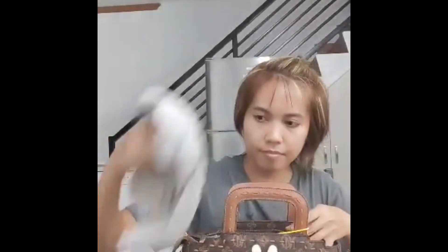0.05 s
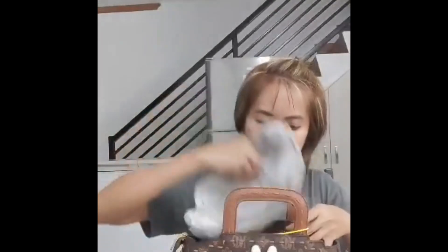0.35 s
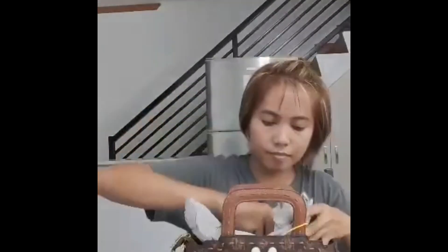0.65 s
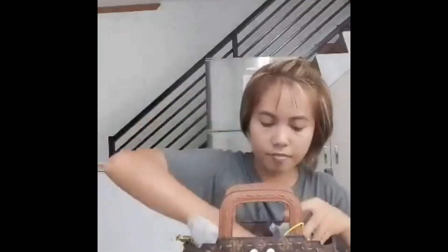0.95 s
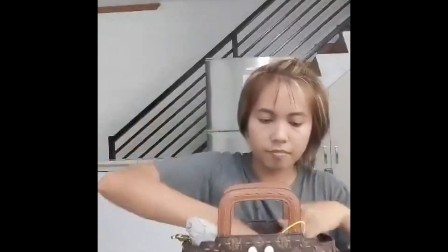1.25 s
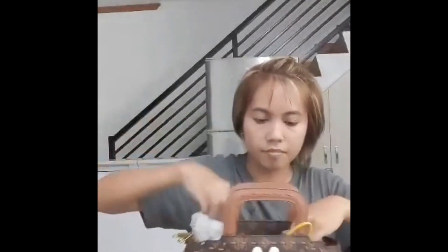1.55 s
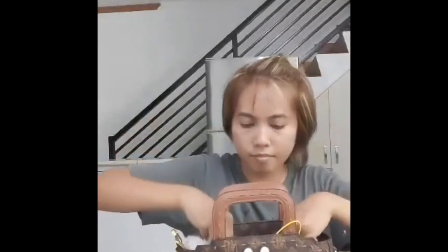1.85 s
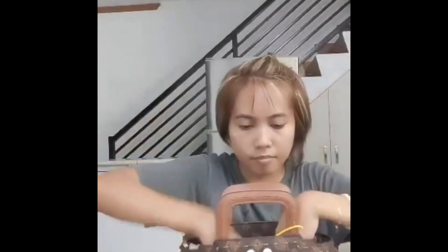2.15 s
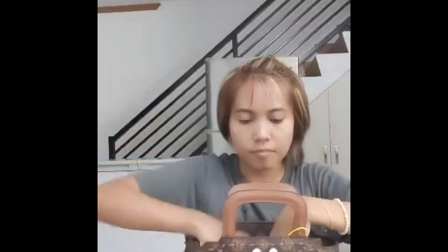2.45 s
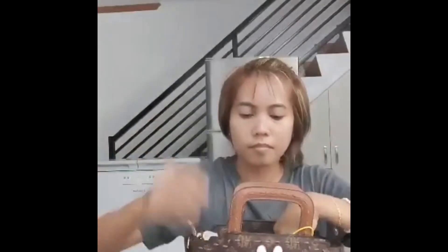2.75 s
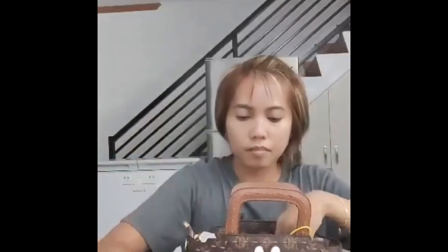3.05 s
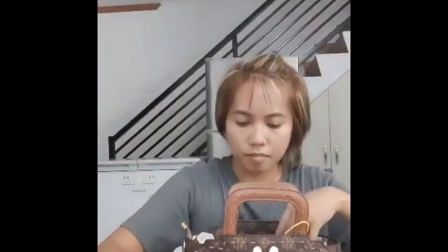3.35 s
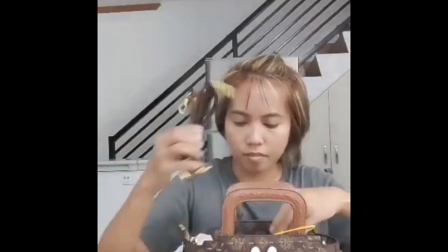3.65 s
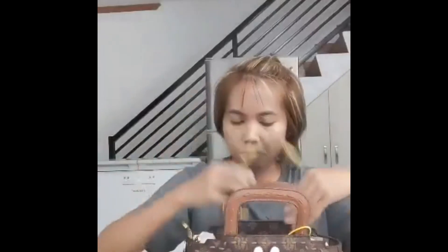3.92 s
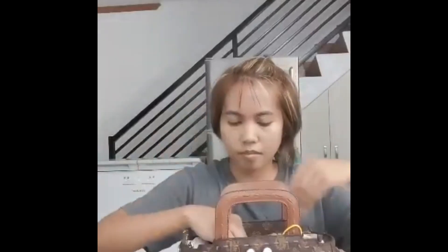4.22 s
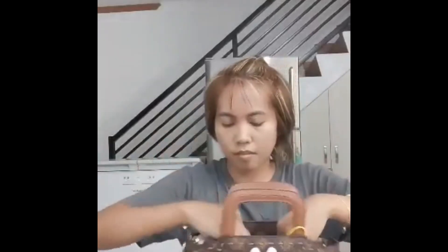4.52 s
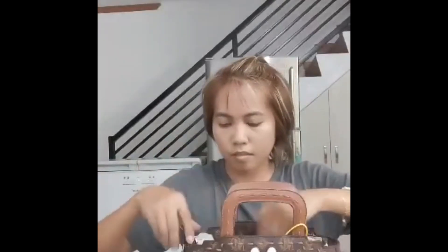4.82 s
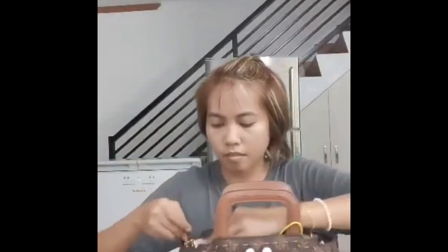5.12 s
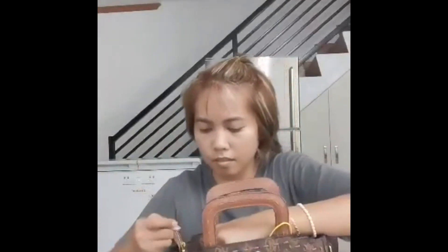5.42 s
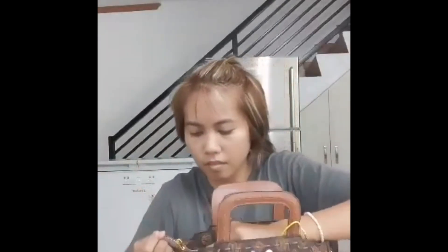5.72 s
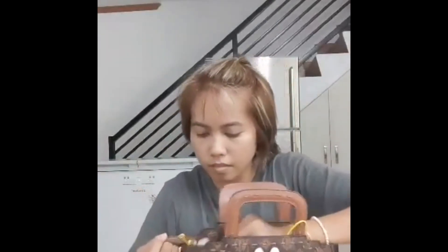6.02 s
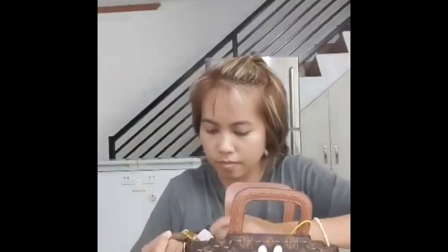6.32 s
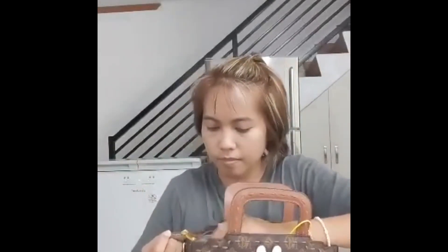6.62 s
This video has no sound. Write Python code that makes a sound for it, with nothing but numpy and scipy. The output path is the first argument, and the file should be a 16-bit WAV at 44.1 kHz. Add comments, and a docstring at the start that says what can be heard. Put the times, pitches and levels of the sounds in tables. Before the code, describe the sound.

Hands rummage in a handbag, paper crinkling in bursts with dull bumps and a faint metal clasp jingle, in a hard-walled room.

```python
"""Crumpled paper scrapes and crackles as two hands stuff it into a stiff handbag and rummage in it.
Fibres stick and slip, creases buckle and pop. The bag's hollow shell rumbles under the rubbing
and thuds when bumped; the metal clasp of a strap clinks faintly as the strap is lifted.
A hard-walled room adds a low boom, even reverberation and a faint steady noise."""
import sys
import numpy as np
from scipy import signal
from scipy.io import wavfile
from scipy.ndimage import uniform_filter1d

SR = 44100
rng = np.random.default_rng(int(sys.argv[2]) if len(sys.argv) > 2 else 0)


def wav_record(signal):
    """Record a signal, one row per channel, as 16-bit PCM in the file named by sys.argv[1]."""
    frames = np.transpose(np.atleast_2d(signal))
    bounded = np.clip(frames, -1, 1)
    # unit amplitude maps onto the largest positive 16-bit level
    quanta = np.round(bounded * 32767).astype(np.int16)
    wavfile.write(sys.argv[1], SR, quanta)


N = 298557

# Paper spectra (body, crinkle, top-end fizz): freq_hz, gain_db
PAPER_EQ = [(30, -47), (60, -38), (200, -8.5), (500, -0.5), (900, 1), (1500, -2.5), (2200, -2.5),
            (3500, -12), (6000, -40.5), (14000, -39.5)]
CRISP_EQ = [(300, -25.5), (1200, -6), (2000, -2.5), (2600, -1.5), (3700, 0), (4400, -13.5), (6000, -28),
            (14000, -56)]
FIZZ_EQ = [(1500, -40), (3600, -13), (4400, -3.5), (5200, 0), (5800, -2.5), (6500, 0), (7000, -3.5),
           (7600, -15), (8400, -13), (9400, -16), (10500, -15), (13000, -22)]
# Hand strokes: start_s, length_s, level_db, crisp_rel_db, fizz_rel_db, pressure_db, pitch_hz
HAND_STROKES = [(-0.003, 0.02, -58, -2, -2, -70, 2400), (0.026, 0.093, -52, -4, -5, -63, 2700),
                (0.118, 0.16, -44, -1, -6, -51.5, 2530), (0.285, 0.073, -42.5, 3, -5, -41.5, 2430),
                (0.418, 0.092, -49.5, 4.5, -3.5, -48.5, 2610), (0.477, 0.19, -41.5, 1, -6.5, -40, 2730),
                (.68, 0.061, -42, -1.5, -8.5, -42, 2350), (0.77, 0.14, -56, 3.5, -9, -59, 2300),
                (0.931, 0.12, -44.5, -0.5, -9, -49, 2470), (1.07, 0.052, -47.5, 0.5, -4, -50, 2180),
                (1.177, 0.19, -51, 4, -2.5, -52, 2850), (1.369, 0.14, -46, 4, -6, -48.5, 2740),
                (1.487, 0.11, -43, -1.5, -7.5, -48, 2700), (1.607, 0.21, -48.5, -2, -10.5, -46, 2100),
                (1.751, 0.17, -40, 1, -8.5, -40.5, 2450), (1.89, 0.11, -42, -4, -8, -46, 2300),
                (2.05, 0.097, -53.5, -2.5, -8, -55, 2250), (2.147, 0.15, -47, -2, -9.5, -44, 2250),
                (2.335, 0.19, -59.5, -6.5, -14, -59.5, 2170), (2.553, 0.44, -62.5, -5, -14, -59.5, 2170),
                (2.758, 0.036, -56, -1.5, -9, -64, 2440), (2.87, 0.14, -58, 0.5, -7.5, -60, 2050),
                (3.123, 0.087, -72.5, 3, -8, -72, 2200), (3.492, 0.07, -70, 3.5, -4.5, -74, 3220),
                (3.63, 0.038, -81, -7, -10, -73, 2100), (3.76, 0.068, -48, -2.5, -9.5, -48.5, 2320),
                (3.94, 0.15, -50, -8, -13.5, -52, 1900), (4.154, 0.087, -46.5, -6, -11.5, -47.5, 2100),
                (4.286, 0.025, -56.5, 4, -4.5, -59, 2500), (4.442, 0.038, -55.5, -4, -9.5, -59, 2140),
                (4.776, 0.055, -65, 6, 0, -68.5, 2900), (4.858, 0.14, -58.5, 5.5, -5, -57.5, 2900),
                (5.035, 0.13, -59, -0.5, -5.5, -58, 2500), (5.136, 0.11, -54.5, -4, -8, -59.5, 2300),
                (5.31, 0.079, -63.5, -1, -6, -63, 2800), (5.433, 0.12, -58, -15, -19, -58.5, 1700),
                (5.527, 0.069, -55, 1.5, -13, -61, 2200), (5.624, 0.12, -58.5, -4, -10, -61, 2000),
                (5.757, 0.077, -54, 4, -6, -51, 2460), (5.95, 0.067, -59, 5, -8, -63, 2060),
                (6.025, 0.04, -56, 6, -4, -54, 2600), (6.096, 0.03, -58, 6, -4, -55, 2620),
                (6.197, 0.034, -58.5, 4, -7, -55.5, 2490), (6.292, 0.11, -52.5, 7, -4.5, -52.5, 3300),
                (6.352, 0.14, -47.5, -1, -10, -47, 2770), (6.6, 0.11, -52.5, 3.5, -7.5, -51.5, 2330)]


def paper_rustle():
    """Fibres scrape and tiny creases buckle; each stroke meets folds that crinkle at another pitch."""
    start_s, length_s, level_db, crisp_db, fizz_db, _, pitch_hz = np.transpose(HAND_STROKES)
    folds = buckling_folds(per_s=1500, spread_db=3, q=2.3)
    ticks = amp(-4.5) * slips(per_s=420, spread_db=-0.5)
    scrape = amp(-7) * slips(per_s=9000, spread_db=-1)
    force = bunching(rate_hz=110, depth_db=3.4) * (folds + ticks + scrape)
    glide_hz = np.interp(np.arange(N) / SR, start_s + length_s / 2, pitch_hz)
    crinkle = moving_resonance(colour(force, CRISP_EQ), glide_hz, width_hz=3500)
    body = amp(-1.4) * unit_rms(colour(force, PAPER_EQ)) * stroke_envelope(level_db)
    crisp = amp(-2.5) * unit_rms(crinkle) * stroke_envelope(level_db + crisp_db)
    fizz = amp(2) * unit_rms(colour(force, FIZZ_EQ)) * stroke_envelope(level_db + fizz_db)
    return body + crisp + fizz


def stroke_envelope(levels_db, swell_share=0.33, settle_s=0.07, sag_db=-1.62):
    """Each stroke gathers speed, tires a little and dies as the folds settle; overlaps add in power."""
    power, t = np.zeros(N), np.arange(SR) / SR
    for (start_s, length_s, *_), level_db in zip(HAND_STROKES, levels_db):
        swell = np.minimum(t / (swell_share * length_s), 1)
        sag = amp(sag_db * np.minimum(t / length_s, 1))
        settle = np.exp(-np.maximum(t - length_s, 0) / settle_s)
        add(power, start_s, (amp(level_db) * swell * sag * settle) ** 2)
    return np.sqrt(power)


def buckling_folds(per_s, spread_db, q, bands=18):
    """Each size of fold pings at its own pitch, in its own brief bunches."""
    out = np.zeros(N)
    for pitch_hz in np.geomspace(600, 12000, bands):
        hits = rng.integers(0, N, int(per_s * N / SR / bands))
        strength = amp(spread_db * np.minimum(rng.exponential(1, len(hits)), 3))
        force = np.zeros(N)
        force[hits] = strength * rng.choice([-1, 1], len(hits))
        bunch_db = 3 * np.minimum(rng.standard_normal(300), 1.5)
        bunch = amp(np.interp(np.arange(N), np.linspace(0, N, len(bunch_db)), bunch_db))
        out += np.sqrt(pitch_hz) * unit_rms(bunch * resonance(force, pitch_hz, q))
    return unit_rms(out)


# Snapping creases: start_s, level_db, fizz_rel_db, crumble_s, pitch_hz
CREASE_SNAPS = [(0.036, -45, -2.5, 0.0096, 3240), (0.054, -35.5, -9, 0.0032, 2470),
                (0.086, -43, -13, 0.0011, 2820), (0.1, -39, -12, 0.0035, 1610),
                (0.175, -39.5, -7, 0.003, 1040), (0.194, -37, -7, 0.006, 890),
                (0.242, -35, -19, 0.0022, 1500), (0.326, -36, -11, 0.013, 1620),
                (0.338, -33.5, -6, 0.005, 1610), (0.362, -28.5, -13, 0.0064, 1230),
                (0.383, -36, -6, 0.006, 1810), (0.508, -41.5, -5, 0.014, 965),
                (0.542, -43, -6, 0.0052, 1290), (0.743, -35.5, -14, 0.006, 2520),
                (0.759, -43, -13, 0.0049, 840), (1.015, -39.5, -7, 0.0098, 1800),
                (1.104, -37, -25, 0.011, 1370), (1.277, -41, -13, 0.002, 1130),
                (1.341, -40.5, -11, 0.0035, 1060), (1.399, -43, 1, 0.003, 2750),
                (1.42, -43, 1, 0.0013, 3340), (1.45, -36, -15, 0.007, 2850),
                (1.572, -34, -23, 0.0023, 1320), (1.597, -44, -15, 0.005, 1600),
                (1.8, -35.5, -1.5, 0.0022, 3540), (1.837, -37, -21, 0.008, 1420),
                (1.883, -34.5, -19, 0.005, 1510), (1.922, -33.5, -12, 0.0055, 710),
                (1.937, -34, -17, 0.0054, 1230), (1.995, -38, -12, 0.0036, 1260),
                (2.144, -38.5, -18, 0.0015, 1030), (2.431, -48, -11, 0.0024, 1470),
                (2.738, -54, -13, 0.0026, 1140), (2.78, -45, -18, 0.011, 2350),
                (2.815, -48, -15, 0.0026, 1330), (2.934, -43.5, -17, 0.0058, 1200),
                (3.001, -49, -16, 0.0028, 1400), (3.155, -59, -16, 0.009, 1940),
                (3.662, -60, -12, 0.0093, 1880), (3.77, -45.5, -19, 0.0017, 666),
                (3.803, -41.5, -10.5, 0.006, 1790), (3.821, -37.5, -17, 0.0072, 950),
                (4.002, -39, -12, 0.0022, 1630), (4.027, -49, -6, 0.005, 1450),
                (4.202, -34, -17, 0.0025, 1220), (4.216, -40.5, -9, 0.008, 1250),
                (4.243, -44, -18, 0.004, 885), (4.907, -50, -11, 0.003, 3190),
                (4.932, -47.5, -7, 0.005, 3190), (4.965, -42.5, -12, 0.0023, 3560),
                (5.024, -51, -11, 0.0024, 2850), (5.178, -49, -14, 0.0054, 1610),
                (5.206, -46, -9, 0.0037, 1750), (5.54, -48.5, -10, 0.005, 710),
                (5.565, -48, -16, 0.003, 2530), (5.583, -41, -18, 0.003, 760),
                (5.786, -49, -14, 0.003, 1320), (5.826, -47.5, -7, 0.0089, 1640),
                (6.036, -44, -12, 0.0053, 1860), (6.052, -45.5, -14, 0.0047, 2750),
                (6.122, -48, -5, 0.0033, 3560), (6.23, -51, -5, 0.008, 900), (6.32, -56, -4, 0.0054, 2380),
                (6.343, -51, 2, 0.0014, 3730), (6.382, -37.5, -1, 0.0022, 930),
                (6.392, -38, -4, 0.0036, 3420), (6.425, -39, -16, 0.0028, 1670),
                (6.467, -39.5, -9, 0.0025, 2610), (6.529, -50, -12, 0.0027, 2070)]


def paper_snaps(size=4096):
    """A crease pops at its own pitch; its neighbours crumble and fizz for some milliseconds."""
    out, t = np.zeros(N), np.arange(size) / SR
    for start_s, level_db, fizz_db, crumble_s, pitch_hz in CREASE_SNAPS:
        crumble = sparse_noise(size, density=0.3) * np.exp(-t / crumble_s)
        force = (t == 0) + amp(-2) * crumble
        crack = colour(force, PAPER_EQ) + colour(force, CRISP_EQ)
        pop = amp(-2) * unit_peak(resonance(crack, pitch_hz, q=0.77) + amp(-9.5) * crack)
        fizz = amp(fizz_db - 3) * unit_peak(colour(crumble * np.sqrt(t), FIZZ_EQ))
        add(out, start_s, amp(level_db) * (pop + fizz))
    return out


# Modes of the bag's shell and hollow: freq_hz, width_hz, gain_db
SHELL_MODES = [(208, 10.2, -1.5), (257.3, 36, -0.5), (320, 53, 3.5), (387.2, 32, 0), (450, 34, -12.5),
               (549, 17, -8.5), (608.6, 25, -1.5), (656, 18, -10), (868, 27, 1.5), (936, 32, 0.5),
               (1110, 39, 3), (1184, 26, 1.5)]
# Low room resonances that boom after bumps and under rubbing: freq_hz, width_hz, gain_db
ROOM_MODES = [(120.5, 6.2, -2), (141.5, 5.9, 0.5), (180.3, 9.1, -4), (207, 5.7, 0)]


def bag_rumble():
    """Rubbing shakes the bag's stiff walls and the air inside, and stirs the room's low resonances."""
    pressure_db = [db for *_, db, _ in HAND_STROKES]
    pressure = stroke_envelope(pressure_db, swell_share=0.43, settle_s=0.064)
    shell = ring(slips(per_s=260, spread_db=1.5), SHELL_MODES)
    shell = unit_rms(colour(shell, [(80, -28), (200, -3), (650, -2), (1500, -15.5)]))
    boom = ring(slips(per_s=650, spread_db=5.5), ROOM_MODES)
    boom = unit_rms(colour(boom, [(40, 3.5), (110, -4.5), (200, 8.5), (500, -16.5)]))
    return amp(-2) * pressure * bunching(rate_hz=44, depth_db=1.5) * (shell + amp(-20) * boom)


# Spectra of the bag wall's knock and the contents' rattle: freq_hz, gain_db
KNOCK_EQ = [(30, -42), (60, -29.5), (150, -11), (260, 1), (520, -2), (1200, 3), (2300, 15.5), (3500, -8),
            (12000, -55)]
RATTLE_EQ = [(60, -34), (150, -8.5), (300, -0.5), (520, -6.5), (900, -0.5), (1500, -7), (2200, -10),
             (4000, -20), (12000, -58)]
# Fingers and strap hitting the bag: start_s, level_db, pitch_hz, boom_rel_db, rattle_rel_db
BAG_BUMPS = [(0.305, -33.5, 296, -24, -2.5), (.318, -30.5, 271, -19, -4.5), (.335, -33, 266, -15, -10),
             (.564, -34.5, 276, -22, -13), (.762, -35.5, 310, -33, -17), (.922, -48, 392, -25, -11),
             (1.265, -42.5, 520, -22, -11), (1.341, -42, 480, -30, -12), (1.925, -26, 366, -28, -10),
             (1.939, -31.5, 330, -19, -7.5), (2.144, -41.5, 600, -26, -6), (2.934, -49, 820, -4, -6),
             (3.002, -54, 450, -24, -5), (3.771, -44.5, 270, -13, -9), (3.778, -44, 220, -4, -14),
             (3.821, -36, 407, -9, -5), (3.827, -38.5, 230, -4.5, -10.5), (3.875, -51.5, 220, -3, -5),
             (4.027, -44, 270, -15, -7), (4.203, -42.5, 380, -19, -11), (4.449, -51.5, 1060, -8, -4),
             (4.507, -52, 320, -15, -7.5), (5.066, -54, 326, -18, -5), (5.374, -47.5, 870, -15, -11),
             (5.411, -46.5, 750, -9.5, -8.5), (5.452, -62, 500, -10, -3), (5.537, -52, 400, -13, -8),
             (5.583, -37, 670, -9.5, -11), (5.787, -48.5, 260, -6, -16), (5.895, -53, 189, -1, -12),
             (6.036, -45.5, 326, -9, -13), (6.226, -45, 343, -27, -16), (6.244, -47.5, 320, -22, -9),
             (6.383, -38.5, 480, -30, -10), (6.67, -46, 320, -21, -10), (6.722, -40.5, 460, -22, -8)]


def bag_thuds(decay_cycles=0.67, rattle_s=0.011, size=16384):
    """The padded wall knocks for about a cycle; the shell rings, the contents rattle, the room booms."""
    out, t = np.zeros(N), np.arange(size) / SR
    for start_s, level_db, pitch_hz, boom_db, rattle_db in BAG_BUMPS:
        blow = np.sin(2 * np.pi * pitch_hz * t) * np.exp(-pitch_hz * t / decay_cycles)
        knock = unit_peak(colour(blow, KNOCK_EQ))
        shell = amp(-20) * unit_peak(ring(knock, SHELL_MODES))
        boom = amp(boom_db) * unit_peak(ring(knock, ROOM_MODES))
        shaking = rng.standard_normal(size) * np.minimum(t / 0.0016, 1) * np.exp(-t / rattle_s)
        rattle = amp(rattle_db) * unit_peak(colour(shaking, RATTLE_EQ))
        add(out, start_s, amp(level_db) * (knock + shell + boom + rattle))
    return out


# Modes of the free clasp: freq_hz, gain_db, t60_s
CLASP_MODES = [(6290, 1.5, 0.19), (6300, -6, 0.2), (6670, -11, 0.16), (7140, -10, 0.25), (10870, -19, .16),
               (12300, -20, 0.18), (12750, -15, 0.12)]
# Clinks, damped by the fingers: start_s, level_db, ring_time_share
CLASP_CLINKS = [(3.349, -63, 0.13), (3.396, -80, 0.8), (3.466, -71, 0.4), (3.474, -66, 0.67),
                (3.497, -70, 0.6), (3.56, -77, .7), (3.664, -66, 0.24), (3.72, -86, 0.89),
                (4.575, -69.5, 0.48)]


def clasp_clinks(chatter_s=0.012, detune=0.006, size=22050):
    """Small metal parts chatter together and ring on, a little differently at each touch."""
    out, t = np.zeros(N), np.arange(size) / SR
    for start_s, level_db, ring_share in CLASP_CLINKS:
        modes = np.zeros(size)
        for freq_hz, gain_db, t60_s in CLASP_MODES:
            gain_jitter, pitch_jitter = rng.standard_normal(2)
            decay = amp(gain_db + 2 * gain_jitter - 60 * t / (t60_s * ring_share))
            modes += decay * np.sin(2 * np.pi * freq_hz * (1 + detune * pitch_jitter) * t)
        chatter = sparse_noise(size, density=600 / SR) * np.exp(-t / (chatter_s * ring_share))
        contacts = (t == 0) + chatter
        tone = signal.fftconvolve(modes, contacts / np.linalg.norm(contacts))[:size]
        hiss = np.diff(rng.standard_normal(size + 1)) / 2
        tick = hiss * np.minimum(t / 0.003, 1) * np.exp(-t / 0.0045)
        add(out, start_s, amp(level_db) * (amp(-1) * tone + tick))
    return out


# Room decay: freq_hz, t60_s
ROOM_DECAY = [(120, 0.78), (500, 0.63), (3000, 0.42), (7000, 0.38), (13000, 0.24)]
# Likeness of the reflections, left to right: freq_hz, correlation
ROOM_COHERENCE = [(50, 0.31), (150, 0.91), (350, 0.86), (600, 0.33), (850, 0.0051), (1500, 0.1), (13000, 0)]


def room_tail(size=26460):
    """Dense stereo reflections, alike in the bass, each band dying at its own speed."""
    taps = sparse_noise((2, size), density=1 / 12)
    hz, t, (left, independent) = signal.stft(taps, SR, nperseg=256)
    coherence = lookup(ROOM_COHERENCE, hz)[:, None]
    right = coherence * left + np.sqrt(1 - coherence ** 2) * independent
    decay = amp(-60 * t / lookup(ROOM_DECAY, hz)[:, None])
    early = 1 + np.exp(-t / 0.0036)  # the table and near walls answer first
    tail = signal.istft(np.array([left, right]) * decay * early, SR, nperseg=256)[1]
    return tail / np.linalg.norm(tail[0])


def room_reflections(x, hop_s=0.045, tails=10):
    """Smooth, even reverberation; overlapping moments use different tails so no pitch rings out."""
    hops = np.arange(N) / SR / hop_s
    wet = np.zeros((2, N))
    for k in range(tails):
        share = np.sin(np.pi / 2 * np.minimum((hops - k) % tails, 2))
        wet += signal.oaconvolve((x * share)[None], room_tail(), axes=1)[:, :N]
    return wet


# Room noise spectrum: freq_hz, gain_db
ROOM_TONE_EQ = [(20, -14), (60, -7), (130, 0.5), (300, 6), (460, -5), (700, -6.5), (2000, -11.5),
                (5000, -23), (13000, -36)]


def room_tone():
    """Faint steady room noise, partly common to both channels."""
    left, right, both = (unit_rms(colour(rng.standard_normal(N), ROOM_TONE_EQ)) for _ in range(3))
    return amp(-78) * (np.array([left, right]) + both)


def slips(per_s, spread_db):
    """Stick-slip impulses of random size, sign and timing."""
    strength = amp(spread_db * np.minimum(rng.exponential(1, N), 4))
    return unit_rms(strength * rng.choice([-1, 1], N) * (rng.random(N) < per_s / SR))


def bunching(rate_hz, depth_db):
    """Random gain: the folds give way in bunches."""
    slow = signal.sosfilt(signal.butter(2, rate_hz, fs=SR, output="sos"), rng.standard_normal(N))
    return unit_rms(amp(depth_db * unit_rms(slow)))


def sparse_noise(shape, density):
    return rng.standard_normal(shape) * (rng.random(shape) < density)


def resonance(x, hz, q):
    return signal.lfilter(*signal.iirpeak(hz, q, SR), x)


def ring(force, modes):
    """Drives a bank of resonances."""
    return sum(amp(db) * resonance(force, hz, hz / width_hz) for hz, width_hz, db in modes)


def moving_resonance(x, hz, width_hz):
    """A resonance that follows the curve hz."""
    carrier = np.exp(2j * np.pi * np.cumsum(hz) / SR)
    pole = np.exp(-np.pi * width_hz / SR)
    return 2 * (carrier * signal.lfilter([1 - pole], [1, -pole], x / carrier)).real


def colour(x, spectrum, size=2048):
    """Minimum-phase filter from (freq_hz, gain_db) points; clicks keep their sharp front."""
    log_gain = np.log(amp(lookup(spectrum, abs(np.fft.fftfreq(size, 1 / SR)))))
    response = np.fft.ifft(np.exp(signal.hilbert(log_gain).conj())).real[:size // 2]
    return signal.oaconvolve(x, response)[:len(x)]


def lookup(points, hz):
    """Interpolates on a log-frequency axis."""
    freq_hz, value = np.transpose(points)
    return np.interp(np.log(hz + 1), np.log(freq_hz + 1), value)


def amp(db):
    return 10 ** (np.asarray(db) / 20)


def unit_rms(x):
    return x / np.sqrt(np.mean(x ** 2) + 1e-20)


def unit_peak(x):
    """Scales the loudest 2 ms to rms 1."""
    return x / np.sqrt(uniform_filter1d(x ** 2, 88).max() + 1e-20)


def add(mix, start_s, sound):
    part = mix[max(round(start_s * SR), 0):][:len(sound)]
    part += sound[:len(part)]


def scene(left_lag_samples=4):
    """Direct sound plus room; the bag faces the listener, the paper lies behind it."""
    layers = [  # sound, direct_db, room_db
        (paper_rustle(), -10, -3.5),
        (bag_rumble(), -1.5, -3.5),
        (paper_snaps(), -1.5, -4),
        (bag_thuds(), -1, -5.5),
        (clasp_clinks(), -1, 1)]
    direct = sum(amp(direct_db) * sound for sound, direct_db, _ in layers)
    send = sum(amp(room_db) * sound for sound, _, room_db in layers)
    stereo = np.array([np.roll(direct, left_lag_samples), direct])  # the right side is a little nearer
    return (stereo + room_reflections(send) + room_tone()) * amp([[-0.4], [0.4]])


def record(dry, cutoff_hz=13050):
    """Steep low-pass."""
    lowpass = signal.firwin(401, cutoff_hz, window=("kaiser", 8), fs=SR)
    return signal.oaconvolve(dry, lowpass[None], "same")


dry = scene()
out = record(dry)
wav_record(out)
```